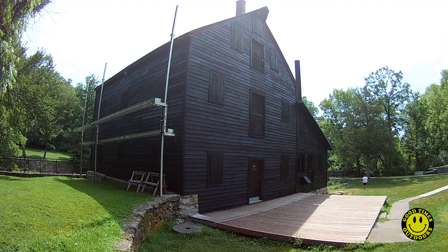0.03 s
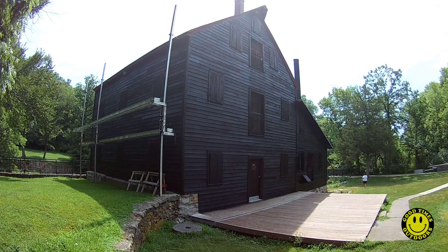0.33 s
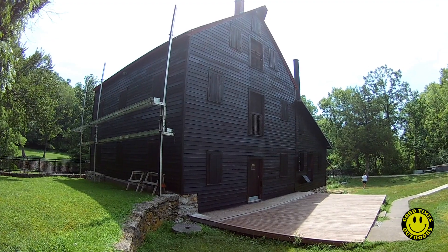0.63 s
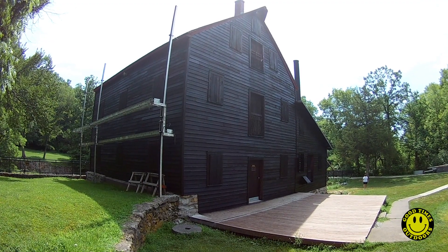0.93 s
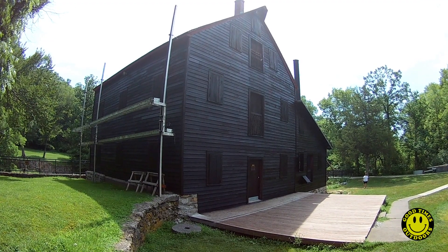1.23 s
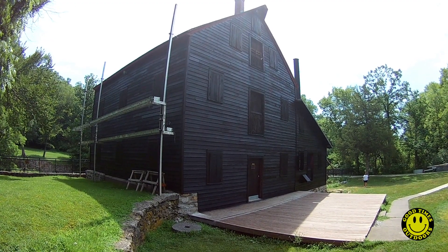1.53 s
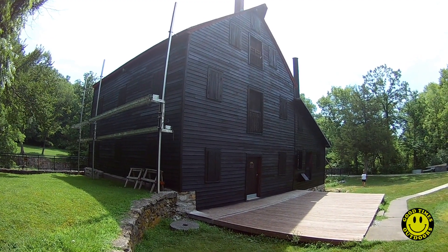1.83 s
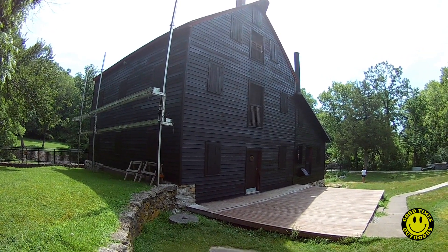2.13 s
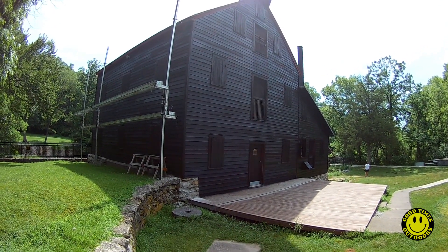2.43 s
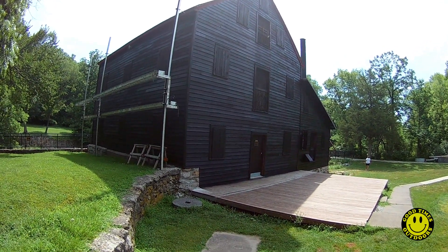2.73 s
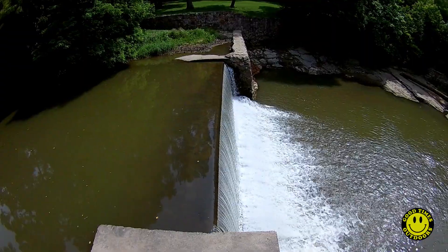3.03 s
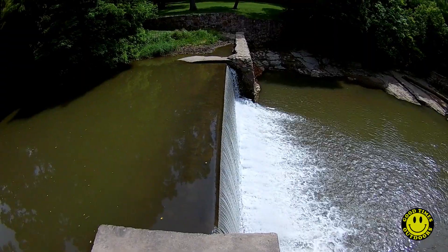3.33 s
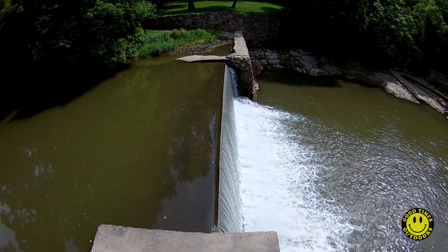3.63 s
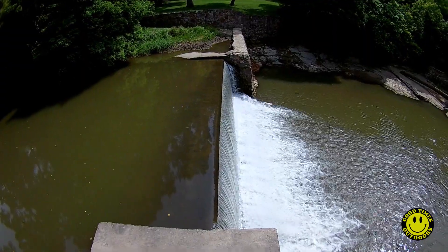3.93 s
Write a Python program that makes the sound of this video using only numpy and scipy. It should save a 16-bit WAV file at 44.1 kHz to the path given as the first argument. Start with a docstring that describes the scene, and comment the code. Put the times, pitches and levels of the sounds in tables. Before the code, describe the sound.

Water rushes over a low dam on a creek. For almost three seconds it is distant, a soft, even rush with a low rumble and a faint gurgle. At about 2.8 seconds an abrupt cut brings it very close and much louder. The water booms into the pool, churns with dense bubbles in quick surges and throws off hissing spray until the end, at about 4 seconds.

```python
"""A low dam on a creek, first from the lawn behind a mill: a soft, even rush over a low rumble.
After an abrupt cut the microphone stands right above the fall. The sheet of water booms into the pool,
churns up dense bubbles in quick surges and throws off a hiss of spray.
The water is coloured noise plus swarms of damped tones for its bubbles and drops."""
import sys
import numpy as np
from scipy import signal
from scipy.fft import rfft, irfft, next_fast_len
from scipy.io import wavfile
from scipy.ndimage import uniform_filter1d, minimum_filter1d, map_coordinates

SR = 44100
rng = np.random.default_rng(int(sys.argv[2]) if len(sys.argv) > 2 else 0)


def waveform_to_disk(signal):
    """Save audio, clipped to [-1, 1], as 16-bit WAV at the path in sys.argv[1]."""
    frames = np.transpose(np.atleast_2d(signal))
    scaled = np.clip(frames, -1, 1) * 32767
    samples = np.round(scaled).astype(np.int16)
    wavfile.write(sys.argv[1], SR, samples)


N = 176400
T = np.arange(N) / SR


def amp(db):
    return 10 ** (np.asarray(db) / 20)


def unit_rms(x):
    return x / np.sqrt(np.mean(x ** 2) + 1e-20)


def curves(rows):
    """One per-sample curve for each column after the time."""
    times_s, *columns = np.transpose(rows)
    return [np.interp(T, times_s, column) for column in columns]


def wobble(knots_per_s):
    """Smooth random curve."""
    return map_coordinates(rng.standard_normal(2048), [T * knots_per_s], mode="wrap")


def filtered(x, gain_at_hz):
    size = next_fast_len(N + SR // 2)
    return irfft(rfft(x, size) * gain_at_hz(np.fft.rfftfreq(size, 1 / SR)), size)[:N]


def coloured(x, spectrum):
    """x shaped by (Hz, dB) points on a log axis, at rms 1."""
    points_hz, points_db = np.transpose(spectrum)

    def gain(hz):
        return amp(np.interp(np.log(hz + 1), np.log(points_hz), points_db, left=-120, right=-120))
    return unit_rms(filtered(x, gain))


def water_noise(spectrum, patchy_db):
    """Coloured noise with random gain patches in time and frequency."""
    bins = signal.stft(rng.standard_normal(N), nperseg=512)[2]
    patches = uniform_filter1d(rng.standard_normal(bins.shape), size=6, axis=0)
    patches = unit_rms(uniform_filter1d(patches, size=8, axis=1))
    noise = signal.istft(bins * amp(patchy_db * patches), nperseg=512)[1][:N]
    return coloured(noise, spectrum)


def bubbles(spectrum, per_s, centre_hz, log_spread, q, rise, size_db):
    """Bubbles of random pitch and size ring, each rising as it dies; the swarm is coloured, at rms 1."""
    count = int(per_s * N / SR)
    onset, size_rank = rng.random((count, 2)).T
    hz = centre_hz * np.exp(log_spread * rng.standard_normal((count, 1)))
    hz = np.clip(hz, centre_hz / 3, SR / 3)
    offsets = np.arange(min(int(2 * q * SR / centre_hz), 4500000 // count))
    age = hz * offsets / SR / q  # 1 after q cycles
    gain = amp(-size_db * np.log(1 - size_rank))[:, None]
    phase = 2 * np.pi * q * age * (1 + rise * np.minimum(age, 2) / 2)
    tones = gain * np.exp(-np.pi * age) * np.sin(phase)
    samples = (onset * N).astype(int)[:, None] + offsets
    return coloured(np.bincount(samples.ravel(), tones.ravel(), N)[:N], spectrum)


def glugs(spectrum, log_spread, rise, size_db):
    """Large bubbles that ring on."""
    return bubbles(spectrum, per_s=600, centre_hz=952.3, log_spread=log_spread,
                   q=42, rise=rise, size_db=size_db)


# Hiss spectrum. Each row: frequency in Hz, relative level in dB.
HISS_SPECTRUM = [(1000, 0), (8000, -0.54), (11500, -1.9), (15500, 2)]

def mic_hiss():
    """Faint, steady self-noise of the microphone."""
    return amp(-65) * coloured(rng.standard_normal(N), HISS_SPECTRUM)


# Rumble spectrum. Each row: frequency in Hz, relative level in dB.
RUMBLE_SPECTRUM = [(12, -47.9), (22, -20), (32, -9), (50, 2), (85, -9), (145, -8), (280, -10), (440, -18),
                   (560, -53.4)]
# Rumble envelope. Each row: time in seconds, level in dB.
RUMBLE_LEVELS = [(0, -33.5), (1.3, -33), (1.8, -34.5), (2.8, -34.5)]

def far_rumble():
    """The low end of the fall, from the lawn."""
    level_db, = curves(RUMBLE_LEVELS)
    return amp(level_db) * water_noise(RUMBLE_SPECTRUM, patchy_db=0.2)


# Distant rush spectrum. Each row: frequency in Hz, relative level in dB.
RUSH_SPECTRUM = [(380, -33), (480, -5.5), (650, -4), (810, -0.5), (940, -3), (1120, -0.5), (1450, -9),
                 (1650, -8), (1950, -17), (2750, -20.5), (3350, -27.0), (3950, -22.5), (4700, -29.4),
                 (6200, -29), (7000, -35.5), (9500, -70.6)]

def far_rush():
    """Distance blurs the fall into an even rush with a faint gurgle."""
    gurgle = glugs(RUSH_SPECTRUM, log_spread=0.5015, rise=0.016, size_db=1.5)
    level_db = -36.5 + 0.22 * wobble(14)
    rush = water_noise(RUSH_SPECTRUM, patchy_db=0.47)
    return amp(level_db) * unit_rms(rush + amp(-6) * gurgle)


# Spray spectrum. Each row: frequency in Hz, relative level in dB.
SPRAY_SPECTRUM = [(2300, -11), (3000, -4), (3800, 0.0), (4350, -5), (4800, -6), (5350, -12.9),
                  (6100, -12.5), (7200, -18.7), (8600, -23), (9600, -23.5), (10700, -31), (11400, -22.5),
                  (12200, -23), (12800, -28), (13800, -64.5)]

def spray(level_db):
    """Mist and small drops thrown off the fall hiss."""
    mist = water_noise(SPRAY_SPECTRUM, patchy_db=0.7)
    drops = bubbles(SPRAY_SPECTRUM, per_s=5000, centre_hz=4470, log_spread=0.42,
                    q=3.7, rise=0.1, size_db=1.5)
    return amp(level_db) * unit_rms(mist + amp(-4) * drops)


# Boom spectrum. Each row: frequency in Hz, relative level in dB.
BOOM_SPECTRUM = [(12, -52.0), (22, -17.0), (45, -2.5), (85, -5.5), (140, 2.5), (240, -3), (340, -4),
                 (420, -9), (540, -37)]

def boom(level_db):
    """The sheet of water plunges into the pool."""
    return amp(level_db + 0.82 * wobble(25)) * water_noise(BOOM_SPECTRUM, patchy_db=0.63)


# Churn spectrum. Each row: frequency in Hz, relative level in dB.
CHURN_SPECTRUM = [(360, -53), (460, -2), (560, -2.5), (900, -0.4), (1150, 0.0), (1450, -1.5), (1600, -8),
                  (1800, -7.5), (2050, -12.5), (2650, -17.5), (3400, -32.5)]
# Churn envelope. Each row: time in seconds, level in dB before surges.
CHURN_LEVELS = [(2.845, -11.5), (2.915, -15), (2.927, -10), (2.987, -14.5), (2.997, -12), (3.093, -15),
                (3.159, -12.5), (3.169, -16), (3.287, -13), (3.345, -14.5), (3.361, -11.5), (3.417, -18.5),
                (3.449, -14), (3.873, -13.5), (3.879, -16), (3.99, -13)]

def churn(surge_db):
    """Air churned into the pool foams and rings as dense bubbles."""
    level_db, = curves(CHURN_LEVELS)
    foam = water_noise(CHURN_SPECTRUM, patchy_db=1.2)
    blips = bubbles(CHURN_SPECTRUM, per_s=2500, centre_hz=1102, log_spread=0.682,
                    q=7.5, rise=0.13, size_db=2.1)
    gurgle = glugs(CHURN_SPECTRUM, log_spread=0.6, rise=0.032, size_db=2.0)
    return amp(level_db + surge_db) * unit_rms(foam + amp(-4.5) * blips + amp(-5.5) * gurgle)


# Close envelopes. Each row: time in seconds, boom base level in dB, spray base level in dB.
BOOM_SPRAY_LEVELS = [(2.845, -19.5, -31), (2.88, -16.5, -32.5), (3.03, -19, -34.5), (3.39, -20.5, -35),
                     (3.66, -18, -34), (3.99, -20.5, -35.5)]

def near_fall():
    """The fall from right above; the same surges drive churn and spray."""
    boom_db, spray_db = curves(BOOM_SPRAY_LEVELS)
    surge_db = 0.68 * wobble(55)
    return boom(boom_db) + churn(surge_db) + spray(spray_db + 0.46 * surge_db)


def scene():
    """The far position, a moment of silence at the cut, then the near one."""
    cut_s, gap_s, fade_s = 2.8356, 0.0043, 0.0008
    far_gate = np.clip((cut_s - T) / fade_s, 0, 1)
    near_gate = np.clip((T - cut_s - gap_s) / fade_s, 0, 1)
    return ((far_rumble() + far_rush()) * far_gate + near_fall() * near_gate)[None]


def limited(x, limit_db, hold_s):
    """The gain ducks smoothly round each peak that would pass the limit."""
    width = 2 * int(hold_s * SR / 2) + 1
    gain = np.minimum(1, amp(limit_db) / (np.abs(x) + 1e-9))
    held = minimum_filter1d(gain, 2 * width + 1)
    return x * uniform_filter1d(uniform_filter1d(held, width), width)


def record(dry):
    """Microphone chain: narrow treble notch, peak limiter, hiss, band limit."""
    notch_hz, width_hz, notch_db, top_hz = 7920, 250, -31, 15750
    notched = filtered(dry[0], lambda hz: amp(notch_db * np.exp(-((hz - notch_hz) / width_hz) ** 2)))
    heard = limited(notched, limit_db=-1.9, hold_s=0.005) + mic_hiss()
    return filtered(heard, lambda hz: hz < top_hz)[None]


dry = scene()
out = record(dry)
waveform_to_disk(out)
```